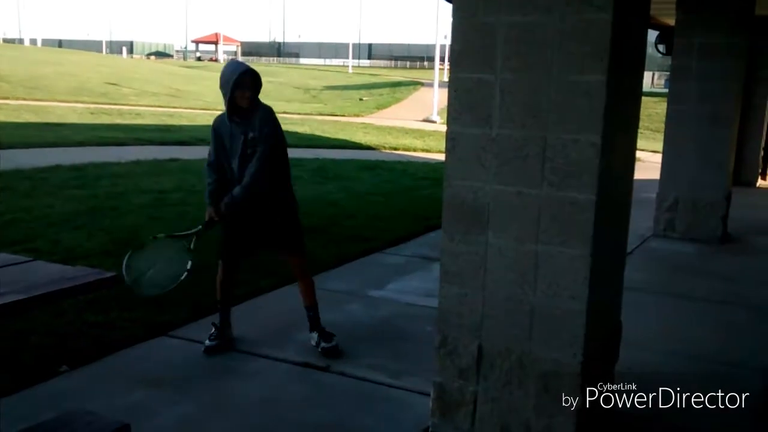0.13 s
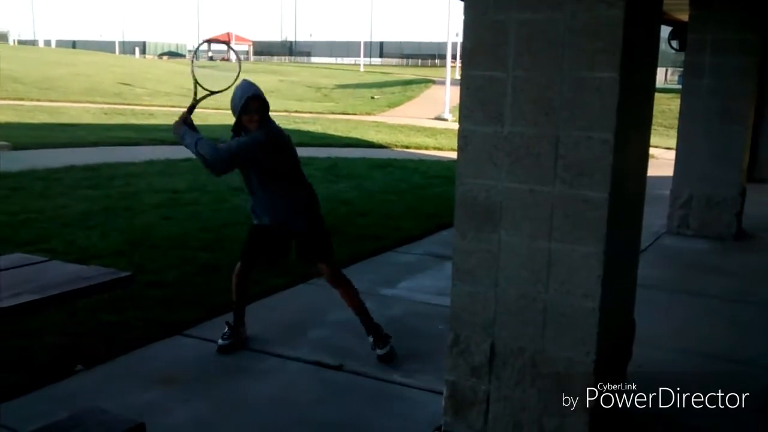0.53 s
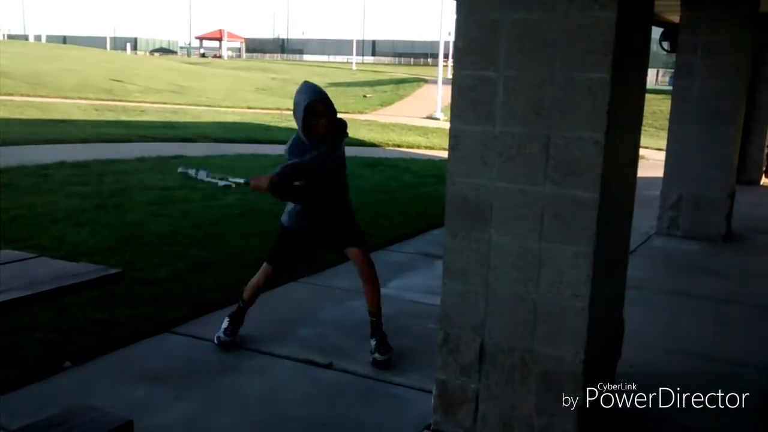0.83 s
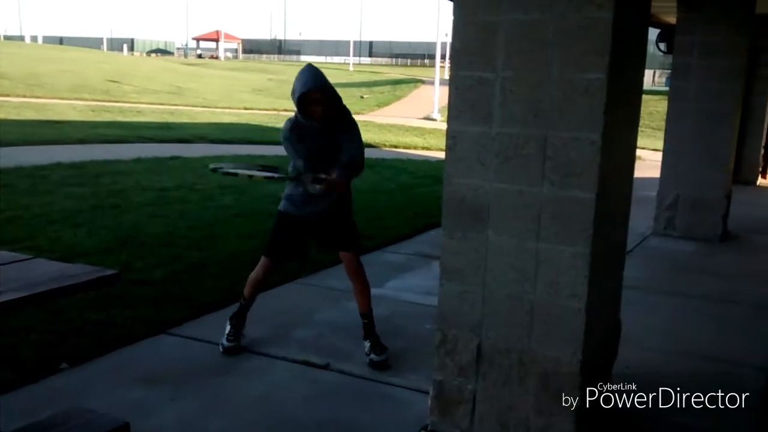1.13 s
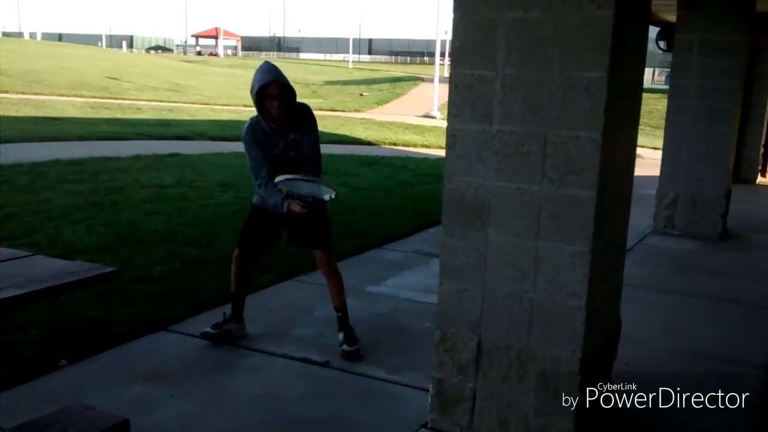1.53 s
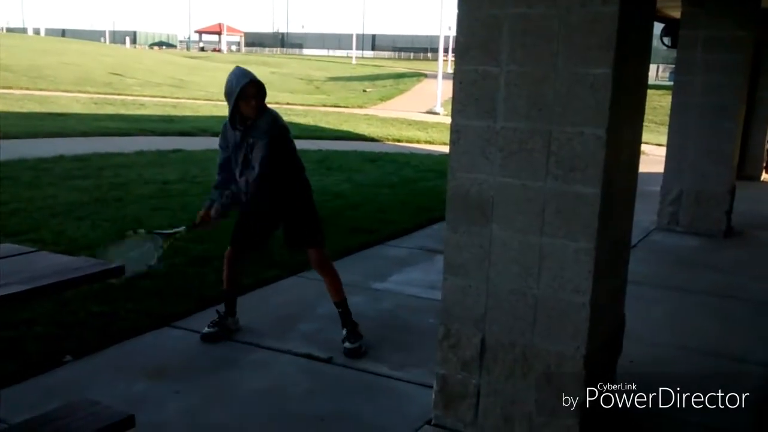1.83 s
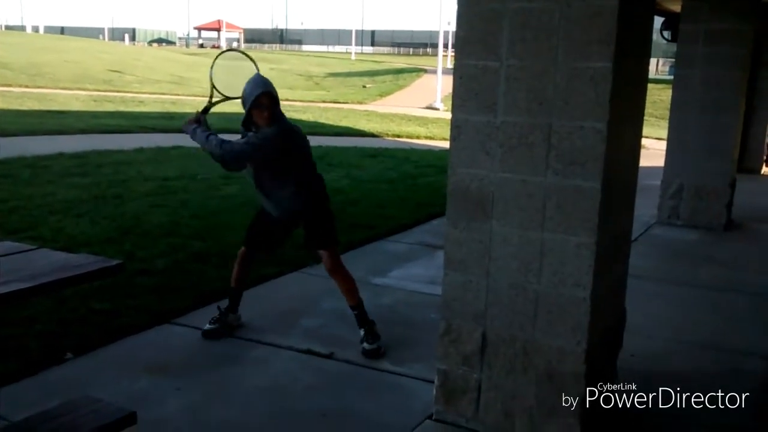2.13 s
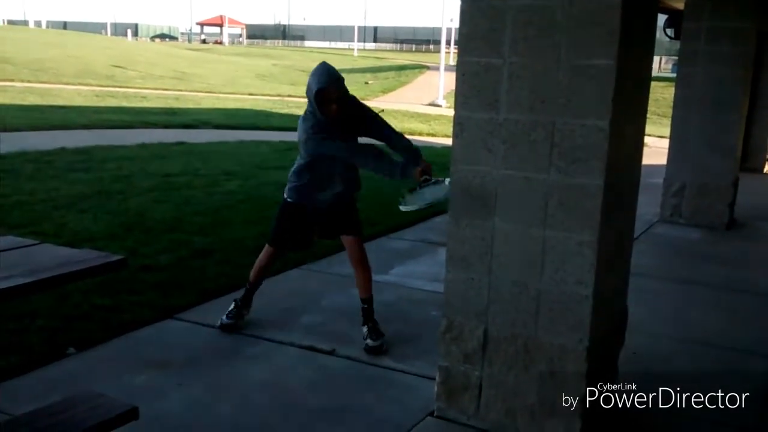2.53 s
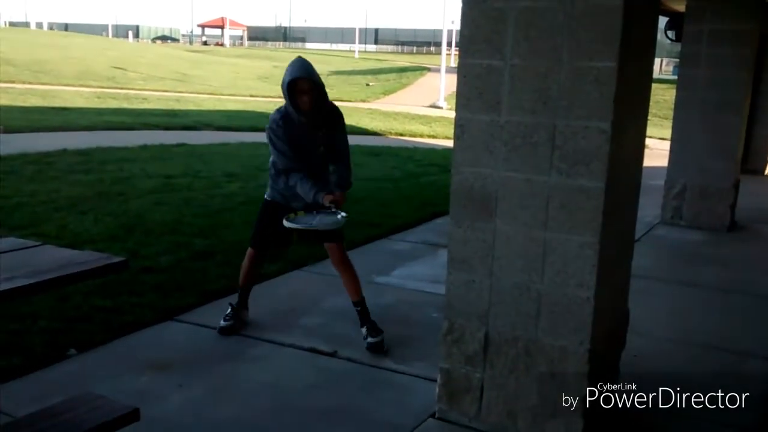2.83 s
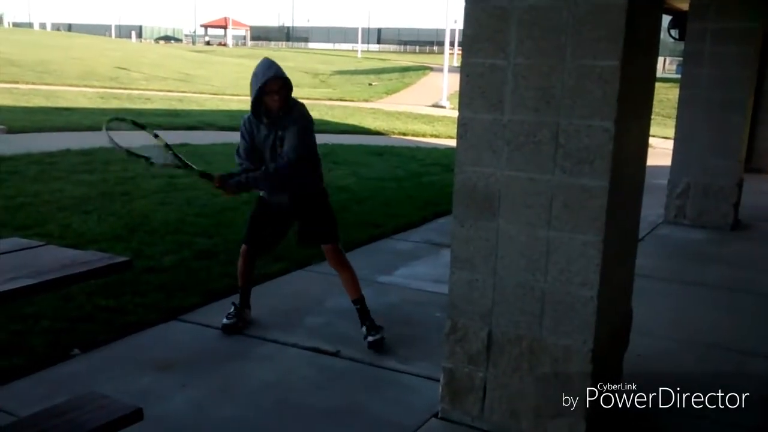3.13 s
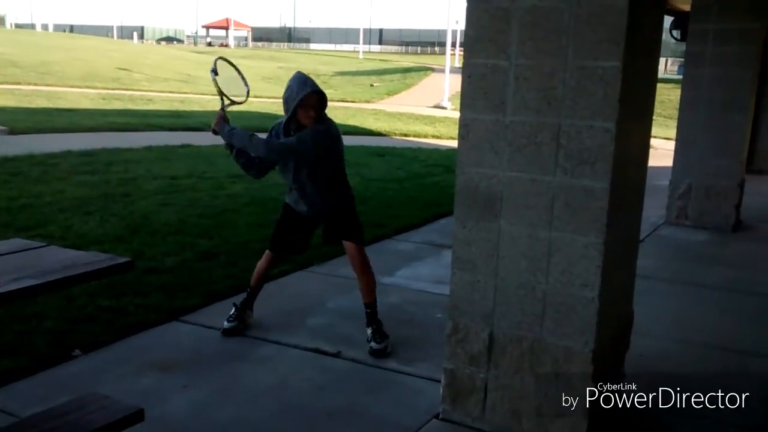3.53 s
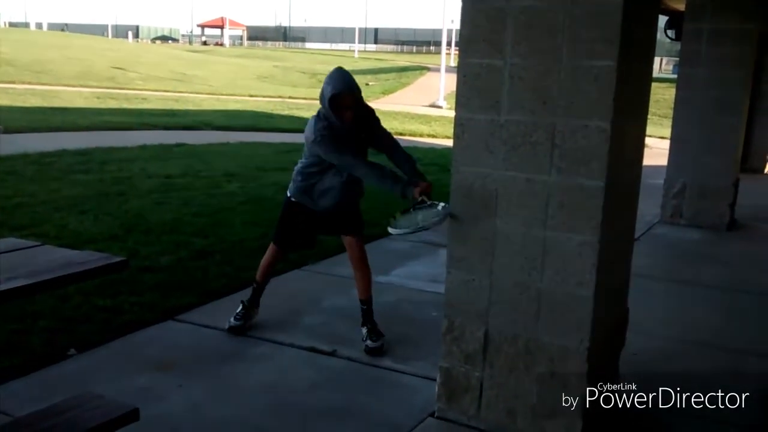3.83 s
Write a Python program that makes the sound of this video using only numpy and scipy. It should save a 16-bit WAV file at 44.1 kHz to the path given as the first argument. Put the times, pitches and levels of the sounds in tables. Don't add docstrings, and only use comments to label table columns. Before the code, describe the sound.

A racket swishes and cracks against a concrete pillar three times, the last hardest, with short shelter echoes. A bird whistles first, shoes scuff between blows, and wind rumbles on a nearby phone over far traffic.

```python
import sys
import numpy as np
from scipy import signal
from scipy.fft import rfft, irfft
from scipy.io import wavfile
from scipy.ndimage import uniform_filter1d

SR = 44100
rng = np.random.default_rng(int(sys.argv[2]) if len(sys.argv) > 2 else 0)


def unload_audio(sound):
    columns = np.transpose(np.atleast_2d(sound))
    steps = np.round(np.clip(columns, -1, 1) * 32767)
    wavfile.write(sys.argv[1], SR, steps.astype(np.int16))


def rack_gain(trim_db):
    fader = np.asarray(trim_db, float)
    return 10 ** (fader / 20)


N = 176400


def noise():
    return rng.standard_normal(N)


def env(t, start, rise, t60):
    u = np.maximum(t - start, 0)
    return np.clip(u / rise, 0, 1) * rack_gain(-60 * np.maximum(u - rise, 0) / t60)


def band(x, hz, width):
    return signal.lfilter(*signal.iirpeak(min(hz, 18000.), hz / width, fs=SR), x)


def unit(x):
    return x / np.sqrt(np.mean(x ** 2))


def colour(x, points):
    f, db = np.array(points).T
    hz = np.arange(513) * SR / 1024
    c = irfft(np.log(rack_gain(np.interp(np.log(hz + 1), np.log(f), db))))
    c[1:512] *= 2
    c[513:] = 0
    return signal.fftconvolve(x, irfft(np.exp(rfft(c))))[:len(x)]


def walk(rate):
    k = int(SR / rate)
    steps = np.repeat(rng.standard_normal(N // k + 1), k)
    return 1.3 * uniform_filter1d(uniform_filter1d(steps, k), k)[:N]


def fir(x, gain, lead=128):
    window = np.hanning(256) * np.clip((np.arange(256) - 128 + lead) / 8, 0, 1)
    return signal.fftconvolve(x, np.roll(irfft(gain), 128) * window, mode="same")


# frequency in Hz, phase lead in radians, level in dB.
PILLAR_PORTS = [(0, 0, 0), (1500, 0, 0), (2300, 3.1, 0), (3100, 6.2, -7), (4300, 6.5, -3), (5000, 8.4, -2),
                (8000, 6.6, 7), (15200, 6.3, 0)]
# frequency in Hz, likeness from -1 to 1, level in dB.
DIFFUSE_PORTS = [(0, .3, 0), (600, .92, 1), (1350, .96, 0), (2350, -.94, -1), (2580, -.93, -2),
                 (3600, .85, -7), (5200, -.75, -4), (6400, .2, 2)]


def ports(x, side=None):
    f, v, db = np.array(PILLAR_PORTS if side is None else DIFFUSE_PORTS).T
    hz = np.arange(129) * SR / 256
    v, g = np.interp(hz, f, v), rack_gain(np.interp(hz, f, db) / 2)
    if side is None:
        left = fir(x, g + 0j, lead=14)
        right = fir(x, np.exp(-1j * v) / g, lead=14)
        return np.array([left, right])
    shared, apart = np.sqrt((1 + v) / 2), np.sqrt((1 - v) / 2)
    left = fir(x, shared * g) + fir(side, apart * g)
    right = fir(x, shared / g) - fir(side, apart / g)
    return np.array([left, right])


# start in seconds, length in seconds, first Hz, last Hz, level in dB.
BIRD_NOTES = [
    (0, .04, 5250, 5100, -50),
    (0.048, 0.12, 4004, 4046, -45),
    (0.175, 0.052, 4050, 4050, -51.5),
    (0.236, 0.044, 4000, 4010, -44.5),
    (0.288, 0.032, 4040, 4060, -54),
    (.345, 0.12, 4640, 4390, -53.5),
    (.355, 0.05, 4030, 4060, -58),
    (0.358, 0.084, 4550, 4240, -48),
    (0.449, 0.15, 3460, 3330, -50.5),
    (0.605, 0.03, 3370, 3480, -49.5),
]


def bird(t):
    out, waver = 0, walk(60.4)
    for start, length, hz0, hz1, db in BIRD_NOTES:
        u = np.clip((t - start) / length, 0, 1)
        glide = hz0 + (hz1 - hz0) * u
        wobble = 1 + 0.0014 * waver + .02 * (hz0 - hz1) / 350 * walk(400)
        phase = 2 * np.pi * np.cumsum(glide * wobble) / SR
        level = rack_gain(db - 1.5 + 2.7 * walk(70)) * np.sin(np.pi * u) ** 0.68
        out = out + level * np.sin(phase)
    return out


# time in seconds, traffic level in dB, wind level in dB.
SWELLS = [(0, -1, -5), (.5, -0.5, -5), (1, 1, -8), (1.3, -3.5, 6), (1.699, -5, 8), (2.1, -3, 3),
          (2.449, 0, 4.5), (2.8, -1.5, -8.5), (3.401, -2, -7), (4, 1, 4.5)]
# frequency in Hz, level in dB per Hz.
TRAFFIC_TONE = [(40, 1), (75, 2), (200, -2), (500, -11.5), (750, -9), (2500, -26.5), (3900, -26),
                (15000, -44.5)]


def traffic(t):
    TRAFFIC_DB, TYRE_HZ, TYRE_WIDTH_HZ, TYRE_DB = -39, 752, 170, -0.5
    s, traffic_db, _ = np.array(SWELLS).T
    hum, other_hum = (unit(colour(noise(), TRAFFIC_TONE)) for _ in range(2))
    town = ports(hum, other_hum) * rack_gain(.8 * walk(18))
    tyres = np.array([band(v, TYRE_HZ, TYRE_WIDTH_HZ) for v in town])
    town = town + rack_gain(TYRE_DB) * tyres
    return town * rack_gain(TRAFFIC_DB + np.interp(t, s, traffic_db))


def wind(t):
    WIND_DB, WIND_HZ, ALIKE = -31.5, 75.6, -.9
    s, _, wind_db = np.array(SWELLS).T
    low = signal.butter(2, WIND_HZ, fs=SR, output="sos")
    flutter = rack_gain(1.5 * walk(8) + 4 * walk(30))
    gust = flutter * rack_gain(np.interp(t, s, wind_db) + WIND_DB)
    mid, side = (unit(signal.sosfilt(low, noise())) for _ in range(2))
    opposite = rack_gain(np.array([[1.1], [-1.2]])) * np.array([[1], [-1]])
    rumble = np.sqrt((1 + ALIKE) / 2) * mid + np.sqrt((1 - ALIKE) / 2) * side * opposite
    return gust * rumble


# start in seconds, level
# in dB, centre in Hz, rise in seconds, 60 dB fall in seconds.
SHOE_AND_GRIP = [(0.684, -44, 1800, .001, .05), (.7, -54, 3712, 0.029, .6),
                 (0.8395, -31, 750, 0.00077, 0.032), (0.957, -47, 7000, 0.0046, 0.11),
                 (1.27, -37.5, 800, 0.0039, .5), (1.553, -40, 3800, 0.022, 0.2),
                 (1.582, -38.5, 280, 0.0061, 0.11), (2.031, -52, 3500, 0.00082, 0.15),
                 (2.15, -51.5, 3300, 0.025, 0.14), (2.2377, -29, 3500, 0.00011, 0.0034),
                 (2.2371, -42.5, 6000, .0003, 0.0028), (2.479, -40, 9000, 0.00035, 0.005),
                 (2.508, -36.5, 5300, .0005, .015), (3.039, -32, 800, .001, .08),
                 (3.7416, -31.5, 3350, 0.00051, 0.044), (3.7447, -32, 1100, 0.00028, 0.085),
                 (3.7472, -33.5, 3240, 0.0004, 0.052), (1.639, -50.5, 3800, 0.031, 0.12),
                 (1.358, -49.5, 3800, 0.017, 0.25), (1.46, -50.5, 3840, 0.037, 0.33),
                 (1.89, -56, 3840, .04, 0.16)]


def scuffs(t):
    out = 0
    for start, db, hz, rise, t60 in SHOE_AND_GRIP:
        grit = unit(band(band(noise(), hz, hz * 0.9), hz, hz * .8))
        out = out + rack_gain(db + 2.0 * walk(300)) * env(t, start, rise, t60) * grit
        if rise < .0015:
            tick = env(t, start, .0002, 4 / hz) * np.sin(2 * np.pi * hz * (t - start))
            out = out + rack_gain(db + 7.5) * tick
    return out


# blow in seconds, swish length in seconds, swish level in dB,
# frame hum level in dB, phone gain after the blow in dB.
SWINGS = [
    (1.0507, 0.1, -30.5, -41, -14),
    (2.5742, 0.077, -31.5, -40.5, -19),
    (3.8901, 0.066, -33, -49, -25),
]


def swings(t):
    HUM_HZ, HUM_T60_S = 281, 0.49
    rush = [(300, -4.5), (1800, -8.5), (3000, -3), (4200, -2.5), (5500, -14), (12000, -26.5)]  # Hz, dB
    air = unit(colour(noise(), rush))
    hum, out = unit(band(noise(), HUM_HZ, 10)), 0
    for blow, length, swish_db, hum_db, _ in SWINGS:
        speed_up = np.clip(1 + (t - blow) / length, 0, 1) ** 2 * (t < blow)
        out = out + rack_gain(swish_db) * air * speed_up
        out = out + rack_gain(hum_db + 18.5) * env(t, blow, 0.026, HUM_T60_S) * hum
    return out


# start in seconds, pitch in Hz, level in dB, 60 dB fall in seconds.
BODY_NOTES = [
    (1.0515, 740, -13.5, 0.045),
    (1.0495, 1904, -14, .03),
    (2.5753, 1137, -16, 0.057),
    (2.5745, 2003, -14, 0.051),
    (3.8915, 1380, -6.5, .04),
    (3.8914, 2120, -13, .02),
]


def body(t):
    out = 0
    for start, hz, db, t60 in BODY_NOTES:
        out = out + rack_gain(db) * env(t, start, .0008, t60) * np.sin(2 * np.pi * hz * (t - start))
    return out


# start in seconds, level in dB, contact length in milliseconds.
CONTACTS = [
    (1.0508, 3.5, 1.2),
    (1.0546, -1, 1.3),
    (2.574, 4.5, 2.3),
    (2.5766, 4.5, 3.9),
    (2.579, 3, 1.3),
    (3.8913, 11, 0.67),
    (3.8932, 15, 0.7),
    (3.897, 8.5, 1.4),
]
# frequency in Hz, level in dB.
CRACK_TONE = [(200, -14), (750, -7), (1400, -7.5), (2500, -4), (4000, -5), (5200, -7), (9000, -10.5),
              (15000, -28)]
# frequency in Hz, width in Hz, level in dB.
CRACK_RESONANCES = [(740, 50, -4), (1380, 200, -5.5), (3460, 300, -5.5), (3853, 320, 12.5),
                    (4060, 300, 11.5), (5970, 700, -4.5), (9400, 300, -12), (12400, 900, -14.5)]


def racket(t):
    grit_level = sum(rack_gain(db - 1.5) * env(t, s, 0.00011, ms / 250) for s, db, ms in CONTACTS)
    push = grit_level * noise()
    for start, db, _ in CONTACTS:
        push[int(start * SR)] += rack_gain(db + 17)
    crack = colour(push, CRACK_TONE)
    ring = sum(rack_gain(db) * band(crack, hz, width) for hz, width, db in CRACK_RESONANCES)
    return rack_gain(1.5) * crack + ring


BLOW_ECHO_DB = [4, 10, 15]
# frequency in Hz, level in dB, 60 dB fall in seconds.
SHELTER_BANDS = [(350.6, -22.5, .4), (800, -10, .28), (1580, -6, 0.25), (2500, -6, 0.36), (3800, 3, 0.24),
                 (5800, -17.5, .24), (9000, -13.5, .2), (13000, -26, .17)]


def shelter_echo(sent):
    GAP_S, SCATTER_DB = 0.003256, 3.5
    FAR_WALL_S, FAR_WALL_DB, FAR_WALL_T60_S = 0.28, -46, .6
    u = np.arange(SR // 2) / SR
    uneven_db = SCATTER_DB * walk(250)[:len(u)] * np.exp(-u / 0.17)
    grains = rng.standard_normal(len(u)) * rack_gain(uneven_db)
    far_wall = rack_gain(FAR_WALL_DB) * env(u, FAR_WALL_S, .03, FAR_WALL_T60_S)
    response = 0
    for hz, db, t60 in SHELTER_BANDS:
        part = band(band(grains, hz, hz * 0.99), hz, hz * 0.99)
        response = response + rack_gain(db) * part * (env(u, GAP_S, 0.0024, t60) + far_wall)
    return signal.fftconvolve(sent, response)[:N]


def shelter(small):
    sent = rack_gain(-36.5) * small
    for swing, db in zip(SWINGS, BLOW_ECHO_DB):
        sent[int(swing[0] * SR)] += rack_gain(db)
    return rack_gain(-3) * ports(shelter_echo(sent), shelter_echo(sent))


def scene():
    t = np.arange(N) / SR
    small = scuffs(t)
    from_pillar = bird(t) + small + swings(t) + body(t) + racket(t)
    return ports(from_pillar) + shelter(small) + traffic(t) + wind(t)


def band_limit(x):
    return signal.sosfilt(signal.butter(12, 15600, fs=SR, output="sos"), x)


def record(dry):
    DUCK_S, HOLD_S, RECOVER_DB_PER_S, HISS_DB = 0.0071, 0.052, 8, -67.5
    t = np.arange(N) / SR
    gain_db = np.zeros(N)
    for blow, *_, after_db in SWINGS:
        recovered_db = RECOVER_DB_PER_S * np.maximum(t - blow - HOLD_S, 0)
        goal_db = np.minimum(after_db + recovered_db, 0)
        gain_db = gain_db + (goal_db - gain_db) * (1 - np.exp(-np.maximum(t - blow, 0) / DUCK_S))
    hiss = rack_gain(HISS_DB) * rng.standard_normal(dry.shape)
    mix = np.clip(dry * rack_gain(gain_db) + hiss, -1, 1)
    return band_limit(mix)


dry = scene()
out = record(dry)
unload_audio(out)
```